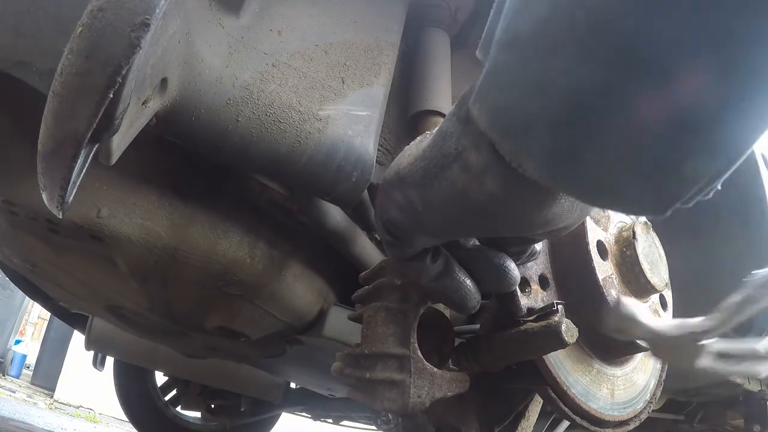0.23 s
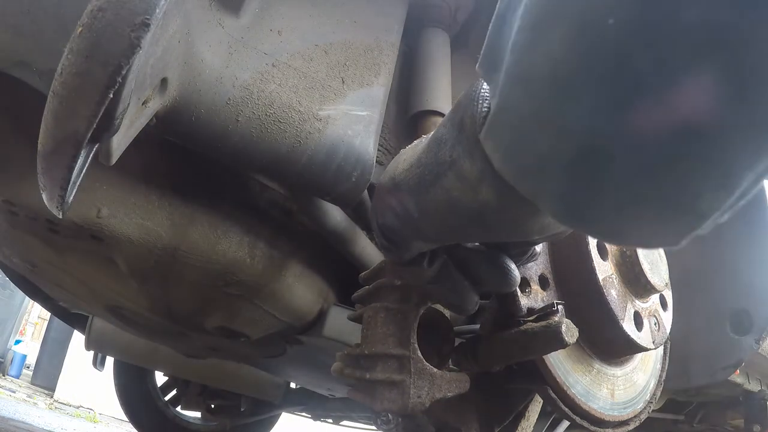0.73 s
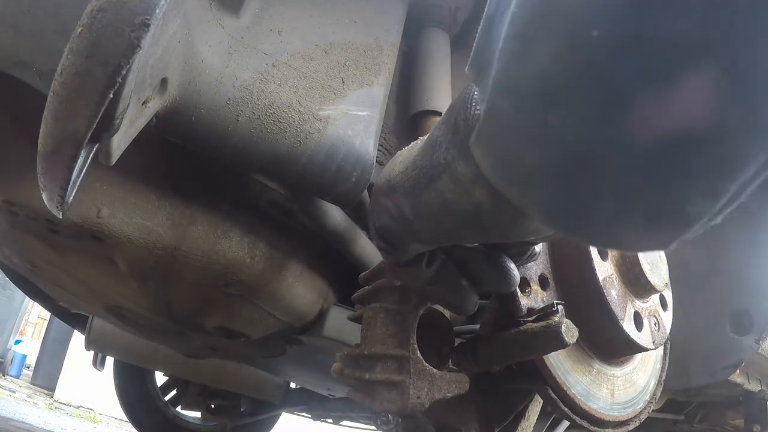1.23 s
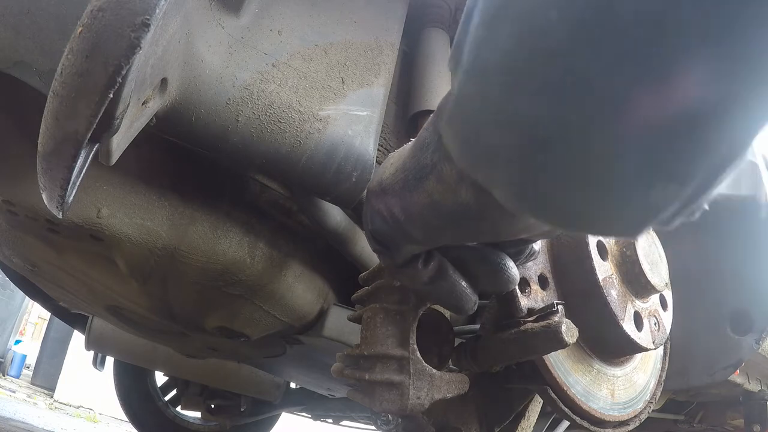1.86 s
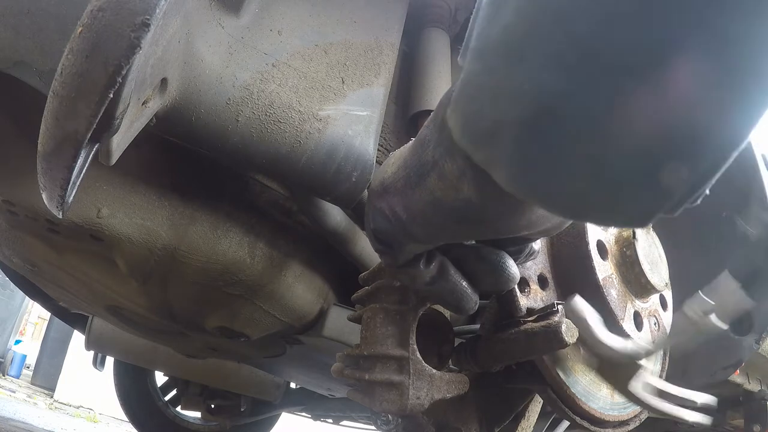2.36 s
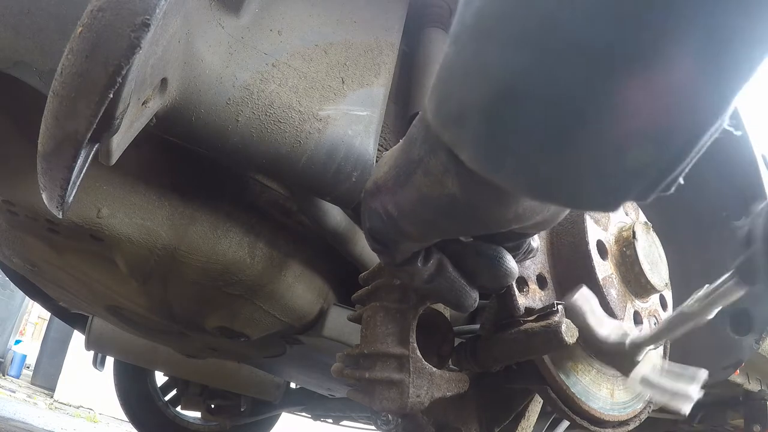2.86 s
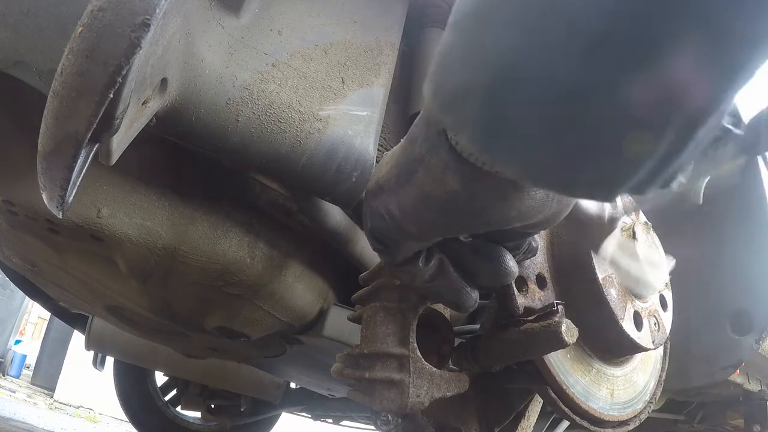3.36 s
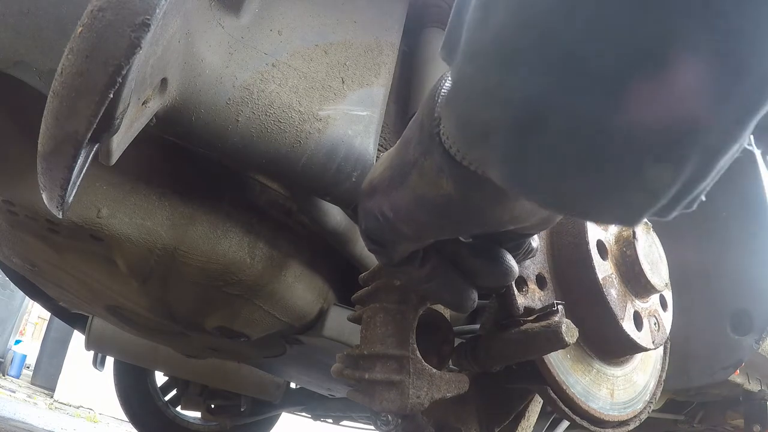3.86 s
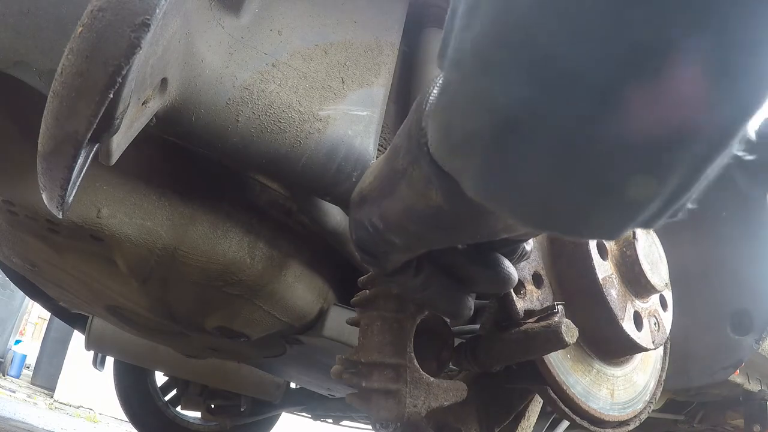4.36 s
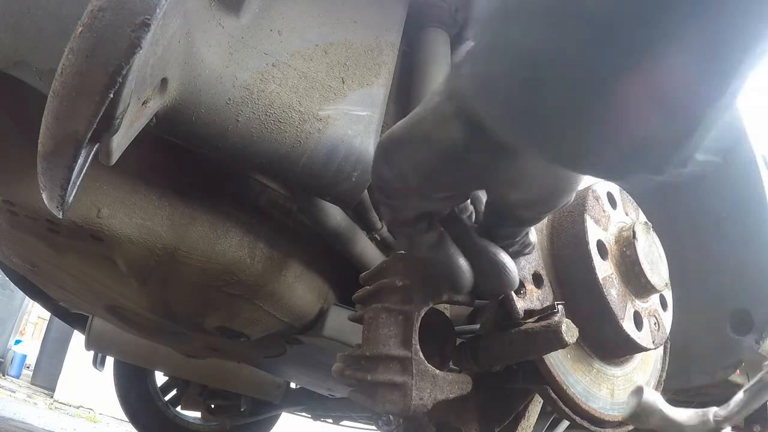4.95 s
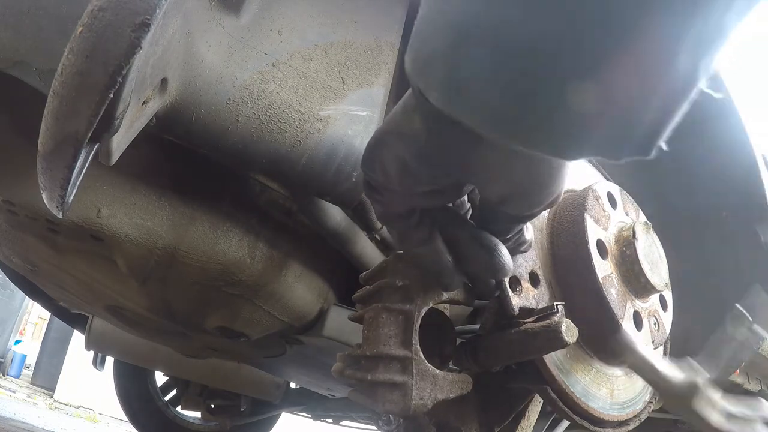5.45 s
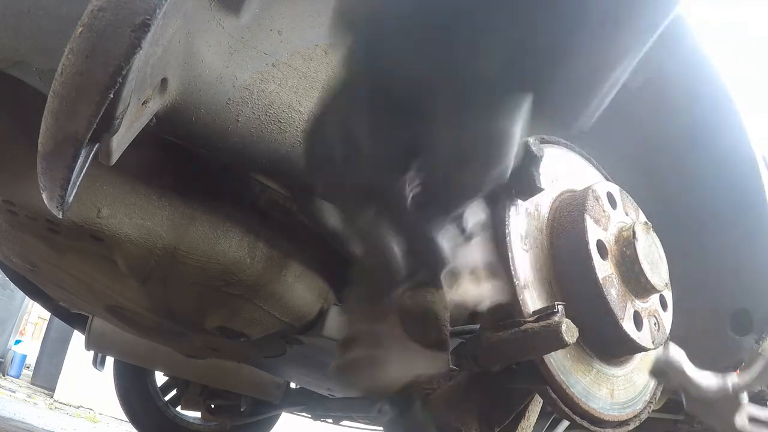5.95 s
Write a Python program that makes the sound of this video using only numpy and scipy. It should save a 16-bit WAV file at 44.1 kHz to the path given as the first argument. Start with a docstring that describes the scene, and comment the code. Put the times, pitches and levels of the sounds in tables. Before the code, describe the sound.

A hammer drives a steel fork into a car's rear suspension, close up in a garage with very little echo. Each blow is a sharp, often slightly doubled metal clank with a short bright ring and a dull thud from the car body. One lands right at the start, three follow between 1 and 1.5 seconds, and five come about a quarter second apart from 2.3 to 3.3 seconds, with light tool taps between them and a brief scrape after. Two more land at 4 and 4.3 seconds, and the last two at 5.3 and 5.6. Around 5.9 seconds loose tools scrape and clatter, followed by a soft bump. A sleeve rustles faintly now and then. Throughout, a low wavering hum and an uneven rumble sit beneath a rushing noise that rises and falls, swelling most near the end at about 6 seconds.

```python
"""From the start, a hammer drives a steel fork into a car's rear suspension, over rushing noise, rumble
and a sinking hum; a sleeve rustles at times. Each of 13 uneven blows lands twice, hammer on fork, then
fork in the joint: the tools ring, the hub clanks, the brake caliper knocks, the car body thuds, and a
limiter squashes the peaks. Loose tools tap in between and scrape at 3.3 s. After the last blow at 5.6 s
they scrape and clatter again while the rushing noise swells."""
import sys
import numpy as np
from scipy import signal
from scipy.fft import rfft, irfft
from scipy.io import wavfile
from scipy.ndimage import uniform_filter1d, minimum_filter1d

SR = 44100
rng = np.random.default_rng(int(sys.argv[2]) if len(sys.argv) > 2 else 0)


def wav_out(sig):
    """Save sig, one row per channel (or a flat mono array), as 16-bit PCM at SR to the path in sys.argv[1]."""
    wavfile.write(sys.argv[1], SR, np.round(np.clip(np.atleast_2d(sig).T, -1, 1) * 32767).astype(np.int16))


N = 272979
TIME_S = np.arange(N) / SR
RING_S = np.arange(SR // 2) / SR  # time after a contact

# Hammer head, fork tines, car body. Each row: frequency in Hz, relative level in dB, nominal t60 in s.
HEAD_MODES = [(3032, 0, .095), (2975, -8, .05)]
TINE_MODES = [(4294, -0.5, 0.075), (4288, -15.5, 0.22)]
BODY_MODES = [(120.6, 2, 0.11), (144.9, 1, 0.16), (196, -4, 0.14), (223, -16, 0.26), (257.5, -13, 0.19),
              (311, -23.5, 0.089), (355, -11.5, 0.23)]


def blows():
    """The hammer strikes the fork, which crosses its play and seats in the joint."""
    # Each row: start in s, force in dB, aim in dB (+ head, - tines), play in s, seating force in dB,
    # tool notes on seating in dB, weight passed to the car in dB, factor on the tools' t60.
    hits = [(0.086, -3, -1, 0.00042, 0, -4.5, -3, 0.57), (0.9856, -2.5, 5, 0.018, -0.5, -1, 3, 0.31),
            (1.2795, 1, 2, 0.0038, 3, 9.5, 2.5, 0.25), (1.547, -4.5, -1, 0.0092, 0.5, 0, 1.5, .9),
            (2.2965, 2, -3, 0.029, 0, 6.5, 2.5, 0.65), (2.5804, 1, -7.5, .016, 0.5, 2.5, -0.5, 0.61),
            (2.8271, -2, -7, 0.0072, -1.5, -7, 0.5, 0.4), (3.0417, 0, 6, 0.006, -0.5, -1, -2.5, 0.46),
            (3.2697, 3, 2, .017, -6, -4, -2, 0.43), (3.991, 3.5, 1.5, 0.00045, 3.5, -8, 0.5, 0.3),
            (4.2822, -2, 8, 0.00035, -1.5, 2, 2.5, 0.66), (5.2901, 2, 3, 0.017, -7.5, 6, 4.5, 0.69),
            (5.592, 3.5, -3.5, 0.027, -4.5, 3, 1, 0.84)]
    # Drive of each part in dB, on striking and on seating.
    strike_mix = dict(clank_db=-10.5, knock_db=-22.5, body_db=-19, crack_db=-21.5, chink_db=-41.5, bending_db=-25, head_db=-11, tines_db=-13.5, shaft_db=-28.5)
    seat_mix = dict(clank_db=-8.5, knock_db=-15.5, body_db=-12.5, crack_db=-8.5, chink_db=-31, bending_db=-29, head_db=-16.5, tines_db=-18.5, shaft_db=-27)
    out = np.zeros(N)
    for start_s, force_db, aim_db, play_s, seat_db, notes_db, weight_db, t60_scale in hits:
        strike = contact(force_db, t60_scale, strike_mix, weight_db, head_db=aim_db, tines_db=-aim_db)
        seat = contact(seat_db, t60_scale, seat_mix, weight_db, head_db=notes_db, tines_db=notes_db)
        add(out, start_s, strike)
        add(out, start_s + play_s, seat)
    return out


def contact(force_db, t60_scale, mix, weight_db=0, head_db=0, tines_db=0, chink_db=0):
    """One touch of steel excites tools and suspension; the spot hit shifts the balance."""
    tools = hand_tools(mix["crack_db"], mix["bending_db"], mix["head_db"] + head_db,
                       mix["tines_db"] + tines_db, mix["shaft_db"], mix["chink_db"] + chink_db, t60_scale)
    car = suspension(mix["clank_db"], mix["knock_db"] + weight_db, mix["body_db"] + weight_db)
    return amp(force_db) * (tools + car)


def hand_tools(crack_db, bending_db, head_db, tines_db, shaft_db, chink_db, t60_scale):
    """Steel on steel: a crack and a bright chink, then hammer and fork ring, shorter when wedged."""
    # Contact noise. Each row: frequency in Hz, relative density in dB.
    crack_spectrum = [(300, -20), (1500, 1), (4000, -2), (7000, -2), (10000, -6), (15000, -25)]
    chink_spectrum = [(3000, -27), (6500, -10.5), (7900, -10), (8700, -2.5), (9600, -7), (11000, -11),
                      (12000, 2), (13000, -10.5), (15500, -14)]
    # Fork modes. Each row: frequency in Hz, relative level in dB, nominal t60 in s.
    bending_modes = [(2079, 0.5, 0.33), (2620, -16.5, 0.1)]
    shaft_modes = [(5785, 0, .16), (7522, -6.5, .18), (9469, -13, .17)]
    crack = amp(crack_db) * noise(crack_spectrum, len(RING_S)) * np.exp(-RING_S / 0.0024)
    chink = amp(chink_db) * noise(chink_spectrum, len(RING_S)) * np.exp(-RING_S / 0.0094)
    head = amp(head_db) * ring(HEAD_MODES, vary_db=0.5, detune=0.002, t60_scale=t60_scale)
    fork_parts = (bending_modes, bending_db), (TINE_MODES, tines_db), (shaft_modes, shaft_db)
    fork = sum(amp(db) * ring(modes, vary_db=1.5, detune=0.0012, t60_scale=t60_scale)
               for modes, db in fork_parts)
    return (crack + chink + head + fork) * swell(rise_s=0.00068)


def suspension(clank_db, knock_db, body_db):
    """A blow runs through hub and caliper, and more slowly into the body panels."""
    # Dense ringing. Each row: frequency in Hz, relative density in dB.
    clank_spectrum = [(60, -2), (300, -6.5), (580, -7.5), (750, 1.5), (1100, -0.5), (1500, 4.5), (1850, 0),
                      (2300, 2), (3300, 4.5), (4800, -5.5), (6300, -13), (9500, -29), (15000, -42)]
    # Its decay. Each row: frequency in Hz, t60 in s.
    clank_t60 = [(150, 0.32), (800, 0.16), (2000, 0.054), (5000, 0.064), (14000, 0.096)]
    # Distinct modes. Each row: frequency in Hz, relative level in dB, t60 in s.
    hub_modes = [(1333, -9.5, 0.15), (1459, 0.5, 0.06), (1563, 1.5, 0.044), (1702, -16.5, 0.11),
                 (2172, 6, 0.058), (2283, -7, 0.12), (2570, -15, 0.17), (2770, -14, 0.074),
                 (2886, 2, 0.043), (3137, -1, 0.11), (3370, 1.5, 0.035)]
    caliper_modes = [(699.4, -11, 0.13), (790, -10, 0.1), (874, -8.5, 0.043), (911, -10, 0.11),
                     (1058, 0.5, 0.059), (1156, -10, 0.093)]
    clank = dense_ring(clank_spectrum, clank_t60)
    hub = (clank + amp(-12) * ring(hub_modes, vary_db=2.5, detune=0.0084)) * swell(rise_s=0.001)
    caliper = ring(caliper_modes, vary_db=4.5, detune=0.012) * swell(rise_s=0.0025)
    body = ring(BODY_MODES, vary_db=3.5, detune=0.014) * swell(rise_s=0.022)
    return amp(clank_db) * hub + amp(knock_db) * caliper + amp(body_db) * body


def handling():
    """Loose tools fall back and tap, edges glance off steel, the car body takes soft bumps."""
    # Each row: start in s, force in dB.
    taps = [(0.196, -42.5), (2.688, -26.5), (2.916, -22), (3.133, -24.5), (3.367, -37), (5.864, -18.5),
            (5.891, -23), (5.923, -25)]
    bumps = [(0.74, -24), (6.088, -23)]
    # Each row: start in s, force in dB, chink offset in dB.
    glances = [(3.317, -25.5, 10), (3.336, -23.5, 2), (5.306, -23.5, 17.5), (5.455, -36.5, -6),
               (5.943, -15, -21), (6.076, -27.5, -14)]
    # Drive of each part in dB, for a tap and for a glance.
    tap_mix = dict(clank_db=0, knock_db=-18, body_db=-19, crack_db=-25, chink_db=-36, bending_db=-28, head_db=-24, tines_db=-24, shaft_db=-26.5)
    glance_mix = dict(clank_db=-8, knock_db=-9, body_db=-9, crack_db=-2.5, chink_db=-15, bending_db=-18, head_db=-13, tines_db=-13, shaft_db=-27)
    out = np.zeros(N)
    for start_s, force_db in taps:
        add(out, start_s, contact(force_db, t60_scale=0.75, mix=tap_mix))
    for start_s, force_db, chink_db in glances:
        add(out, start_s, contact(force_db, t60_scale=0.66, mix=glance_mix, chink_db=chink_db))
    for start_s, force_db in bumps:
        panels = ring(BODY_MODES, vary_db=2, detune=0.012)
        add(out, start_s, amp(force_db) * panels * swell(rise_s=0.014))
    return out


def scrapes(slips_per_s=400):
    """Sliding steel sticks and slips; each slip rings hub and tools briefly."""
    # Each row: start in s, length in s, level in dB.
    slides = [(3.307, 0.029, -36.5), (5.46, 0.032, -55), (5.751, 0.057, -45), (5.859, 0.099, -26.5),
              (6.077, 0.023, -49)]
    # Hub response to a slip. Each row: frequency in Hz, relative density in dB.
    slip_spectrum = [(600, 14), (1400, 12.5), (2200, 2), (3100, -11), (4200, 11.5), (5500, -24),
                     (8500, -6.5), (12000, -23), (15000, -27)]
    out = np.zeros(N)
    for start_s, length_s, level_db in slides:
        chance, strength = rng.random((2, len(RING_S)))
        slips = (chance < slips_per_s / SR) * (RING_S < length_s) * strength ** 2
        tools = amp(-11) * ring(HEAD_MODES + TINE_MODES, vary_db=2, detune=0.002, t60_scale=0.6)
        hub = dense_ring(slip_spectrum, t60_curve=[(1000, 0.036), (12000, 0.023)])
        scrape = signal.fftconvolve(slips, hub + tools)
        rms = np.sqrt((np.sum(scrape ** 2) + 1e-12) / (length_s * SR))
        add(out, start_s, amp(level_db) * scrape / rms)
    return out


def garage(x, wet_db):
    """Floor and walls return a short tail."""
    tail = dense_ring(spectrum=[(100, 7.5), (3000, -15.5), (14000, 0.5)],
                      t60_curve=[(200, 0.38), (3000, 0.5), (12000, 0.11)])
    tail *= swell(rise_s=0.0089)
    return amp(wet_db) * signal.oaconvolve(x, tail / np.linalg.norm(tail))[:N]


def rush_and_rumble(rush_gain_db=3, rumble_gain_db=2):
    """A rushing noise swells and sinks over an uneven rumble."""
    # Each row: time in s, level before gain in dB.
    rush_levels = [(0.0, -55), (0.45, -53.5), (1.12, -42), (1.45, -50.5), (1.81, -45), (2.19, -36.5),
                   (2.39, -42), (2.69, -44.5), (3.05, -37), (3.57, -39.5), (3.89, -33.5), (4.05, -44.5),
                   (4.53, -42), (4.81, -34.5), (5.14, -32), (5.84, -37), (6.07, -25), (6.19, -28)]
    rumble_levels = [(0.0, -41), (0.45, -47.5), (1.22, -34), (1.93, -41.5), (2.21, -36.5), (3.98, -32.5),
                     (4.45, -39), (6.19, -25.5)]
    # Each row: frequency in Hz, relative density in dB.
    rush_spectrum = [(150, 4.5), (300, 1), (500, -0.5), (850, 5), (1300, -2.5), (2000, -11), (3200, -19.5),
                     (5000, -28), (9000, -44), (15000, -62.5)]
    rumble_spectrum = [(12, -17.5), (30, 3), (55, -2), (80, -1.5), (115, -1), (180, -8.5), (300, -8),
                       (600, -37.5), (2000, -59.5)]
    rush_db = over_time(rush_levels) + rush_gain_db + 0.71 * wander(rate_hz=27)
    rush = amp(rush_db) * noise(rush_spectrum, N)
    rumble_db = over_time(rumble_levels) + rumble_gain_db + 1.7 * wander(rate_hz=17)
    rumble = amp(rumble_db) * noise(rumble_spectrum, N)
    return rush + rumble


def hum(start_hz=52.3, sag_hz_per_s=0.9):
    """A low tone sinks slowly, wavering in pitch and level."""
    # Each row: time in s, level in dB.
    levels = [(0, -31.5), (.4, -34), (.89, -23.5), (1.1, -29), (2.45, -27.5), (2.8, -36), (3.7, -33),
              (6.19, -39.5)]
    pitch_hz = start_hz - sag_hz_per_s * TIME_S + 1.2 * wander(rate_hz=8)
    level_db = over_time(levels) + 2 * wander(rate_hz=27)
    return np.sqrt(2) * amp(level_db) * np.sin(2 * np.pi * np.cumsum(pitch_hz) / SR)


def sleeve():
    """Cloth brushes softly as the arm moves."""
    # Each row: start in s, length in s, peak level in dB.
    strokes = [(0.243, 0.21, -57), (0.41, 0.41, -53.5), (1.763, 0.14, -54), (3.551, 0.18, -56.5),
               (4.58, 0.32, -52)]
    # Each row: frequency in Hz, relative density in dB.
    cloth_spectrum = [(500, -10.5), (2000, 4), (3500, 4), (6000, -5), (10000, -14.5), (15000, -19)]
    envelope = np.zeros(N)
    for start_s, length_s, level_db in strokes:
        add(envelope, start_s, amp(level_db) * signal.windows.hann(round(length_s * SR)))
    return envelope * amp(wander(rate_hz=65)) * noise(cloth_spectrum, N)


def ring(modes, vary_db, detune, t60_scale=1):
    """Damped modes; spot and grip scatter their level and pitch."""
    hz, db, t60_s = np.transpose(modes)
    strength, shift, phase = rng.standard_normal((len(hz), 3)).T
    poles = 2j * np.pi * hz * (1 + detune * shift) - np.log(1000) / (t60_s * t60_scale)
    weights = amp(db + vary_db * strength) * np.exp(2j * np.pi * phase)
    return np.sqrt(2) * (weights @ np.exp(poles[:, None] * RING_S)).imag


def dense_ring(spectrum, t60_curve):
    """Overlapping modes as noise whose bands decay along a (Hz, t60 in s) curve."""
    hz, time_s, bands = signal.stft(noise(spectrum, len(RING_S)), SR, nperseg=256)
    decay = amp(-60 * time_s / over_frequency(t60_curve, hz)[:, None])
    return signal.istft(bands * decay, SR)[1][:len(RING_S)]


def swell(rise_s):
    """Build-up of a vibration, with time constant rise_s."""
    return 1 - np.exp(-RING_S / rise_s)


def noise(spectrum, size):
    """Noise of rms 1, shaped by (Hz, dB) points."""
    hz = np.fft.rfftfreq(size, 1 / SR)
    phasors = np.exp(2j * np.pi * rng.random(len(hz)))
    return unit_rms(irfft(amp(over_frequency(spectrum, hz)) * phasors, size))


def wander(rate_hz):
    """Random drift of rms 1."""
    hz = np.fft.rfftfreq(N, 1 / SR)
    low_pass = np.exp(-(hz / rate_hz) ** 2)
    return unit_rms(irfft(rfft(rng.standard_normal(N)) * low_pass, N))


def over_frequency(points, hz):
    """Interpolates on a log-frequency axis."""
    point_hz, values = np.transpose(points)
    return np.interp(np.log(hz + 1), np.log(point_hz + 1), values)


def over_time(points):
    """Interpolates at every sample."""
    return np.interp(TIME_S, *np.transpose(points))


def add(out, start_s, sound):
    """Mixes a sound in at start_s."""
    part = out[round(start_s * SR):][:len(sound)]
    part += sound[:len(part)]


def amp(db):
    """Decibels to gain."""
    return 10 ** (np.asarray(db) / 20)


def unit_rms(x):
    """Scales to rms 1."""
    return x / np.sqrt(np.mean(x ** 2) + 1e-20)


def scene():
    """Tools in the garage over the background, mono."""
    work = blows() + handling() + scrapes()
    return (work + garage(work, wet_db=-27.5) + rush_and_rumble() + hum() + sleeve())[None]


def limiter(x, ceiling_db, recover_db_per_s):
    """Gain drops just ahead of each peak over the ceiling, then recovers."""
    over_db = np.maximum(20 * np.log10(abs(x) + 1e-9) - ceiling_db, 0)
    recovery_db = TIME_S * recover_db_per_s
    held_db = np.maximum.accumulate(over_db + recovery_db) - recovery_db
    gain_db = uniform_filter1d(minimum_filter1d(-held_db, size=45), size=45)
    return x * amp(gain_db)


def record(dry, cutoff_hz=15500):
    """Limiter, then low-pass."""
    limited = limiter(dry[0], ceiling_db=1.94, recover_db_per_s=653.5)
    low_pass = signal.firwin(255, cutoff_hz, window=("kaiser", 9), fs=SR)
    return signal.oaconvolve(limited, low_pass, "same")[None]


dry = scene()
out = record(dry)
wav_out(out)
```